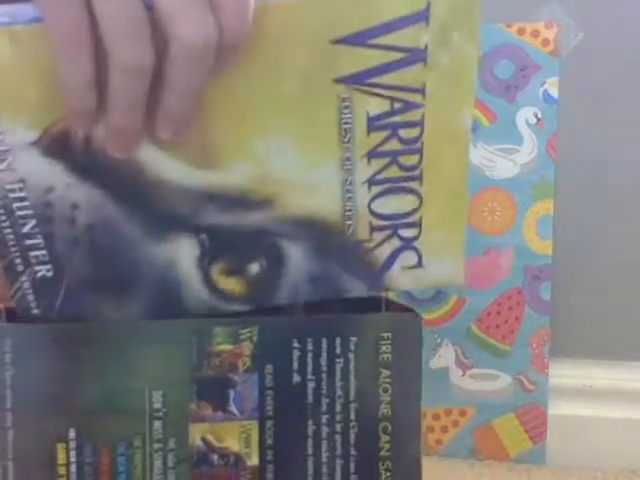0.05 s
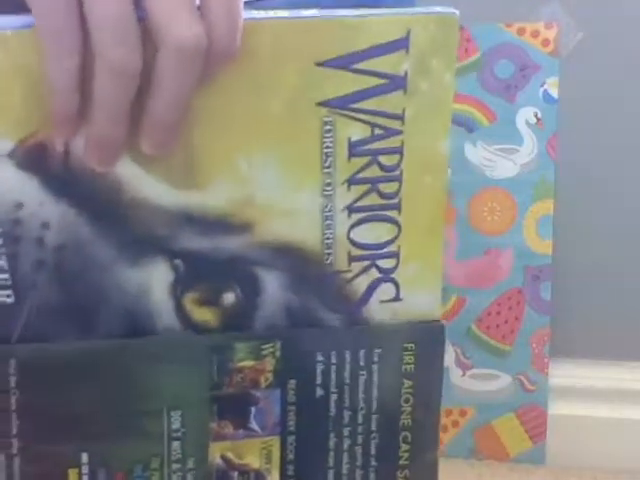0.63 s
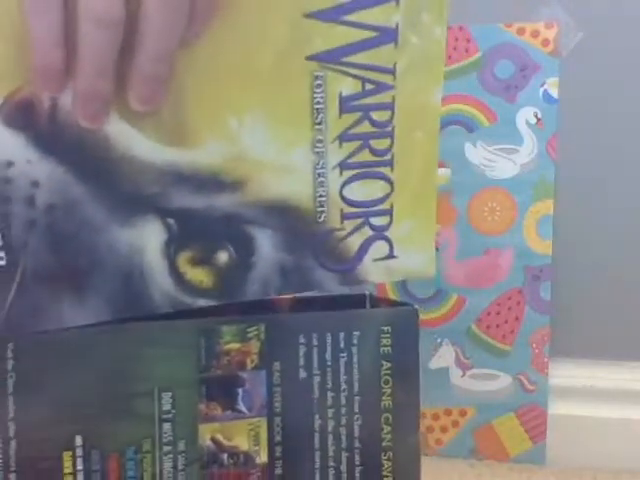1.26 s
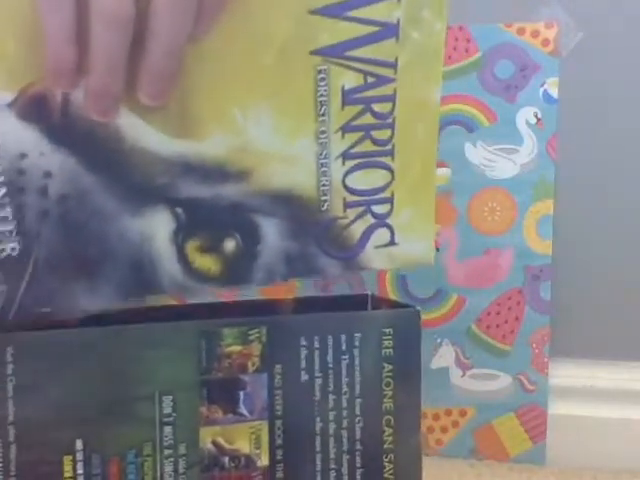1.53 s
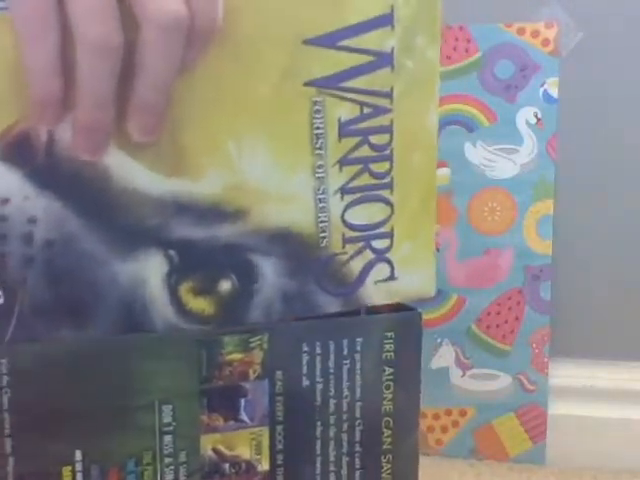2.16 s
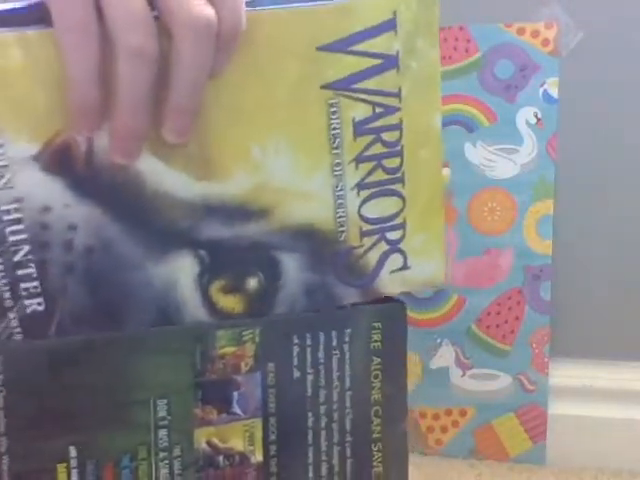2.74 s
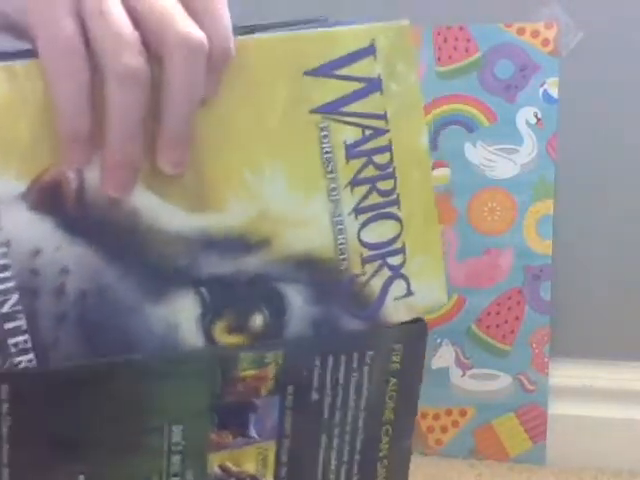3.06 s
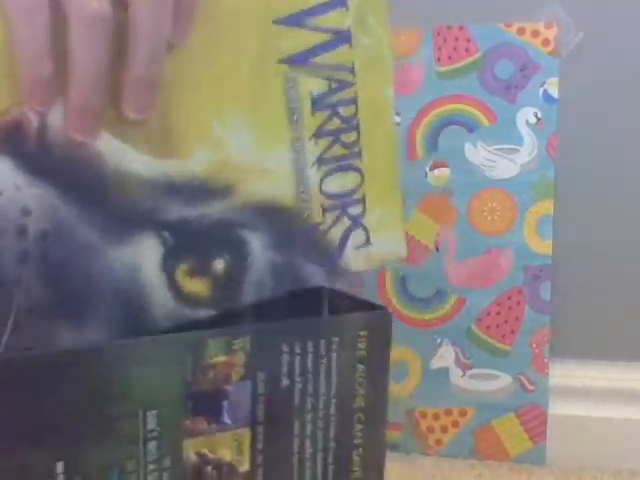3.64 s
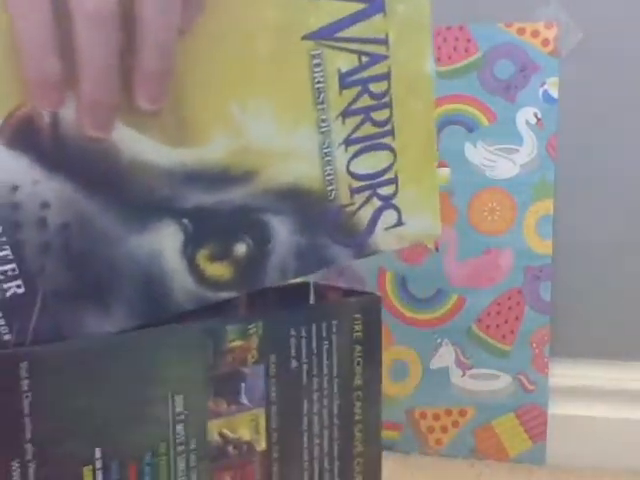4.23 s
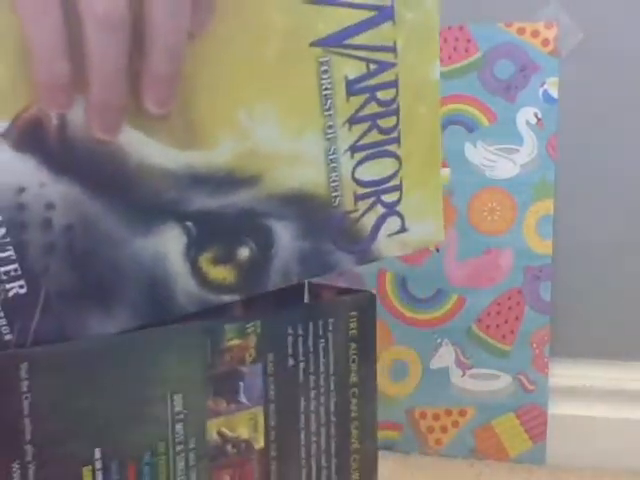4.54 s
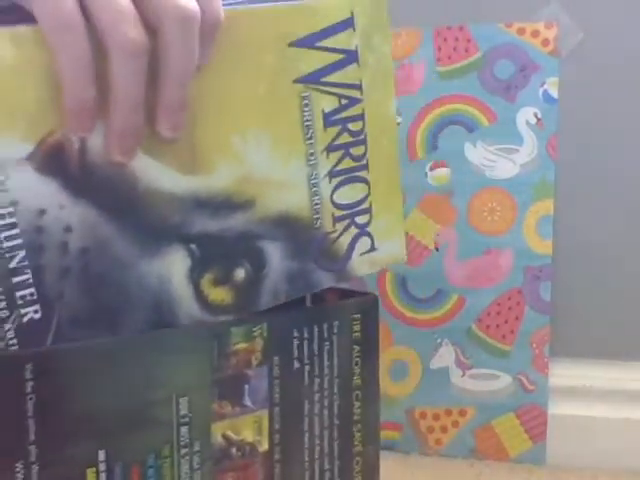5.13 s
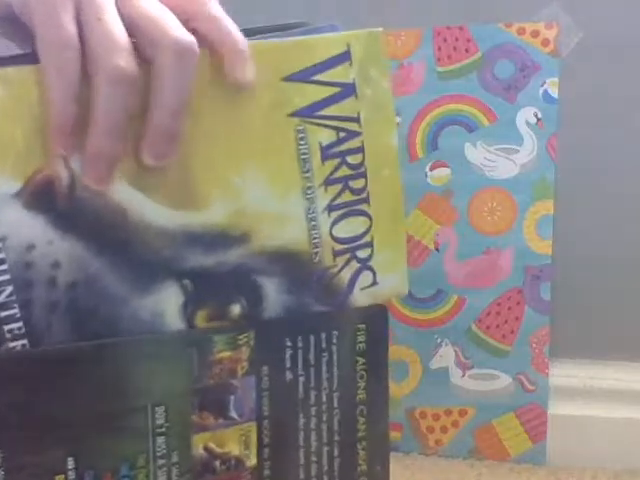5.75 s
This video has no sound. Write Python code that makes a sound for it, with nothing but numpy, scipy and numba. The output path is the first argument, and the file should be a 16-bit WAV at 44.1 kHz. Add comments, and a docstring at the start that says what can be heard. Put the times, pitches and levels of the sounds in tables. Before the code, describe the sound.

Paperback books are worked in and out of a cardboard case, heard close in a quiet room. Short, stuttering rubs of card with a papery hiss begin at once, and a hollow knock lands at about 0.4 seconds. Light sliding and small taps follow, with a crisp paper snap and a knock at 1.7 seconds. More short rubs and taps come between 2 and 2.6 seconds. Around 3 seconds a firmer scrape brings a quick cluster of knocks, snaps and low bumps. Softer sliding continues, with taps near 3.9 and 4.3 seconds. A rougher scrape swells at 5 seconds, then a sharp snap and knock hit at 5.5 seconds. Just before 6 seconds the books land with the loudest thump. A faint hiss and a thin, high electronic whine run underneath throughout.

```python
"""A soft, close rub of card over faint hiss and whine: paperbacks worked in and out of a slipcase.
The covers slide in short strokes; countless tiny slips ring the cardboard case and the cover,
and the page edges hiss. Paper snaps free, corners catch and knock, and the stack lands with a thump.
Lightly sliding edges sing with a rough tone. The room is quiet; the whine is the electronics."""
import sys
import numpy as np
from scipy import signal
from scipy.fft import rfft, irfft
from scipy.io import wavfile
from scipy.ndimage import uniform_filter1d
from numba import njit

SR = 44100
rng = np.random.default_rng(int(sys.argv[2]) if len(sys.argv) > 2 else 0)


def master(y):
    """Save y as 16-bit WAV."""
    cut = np.clip(np.atleast_2d(y).T, -1, 1)
    pcm = np.round(cut * 32767)  # scale
    wavfile.write(sys.argv[1], SR, pcm.astype(np.int16))


N = 264050
TIME = np.arange(N) / SR

# strokes of a cover along the case: peak_s, hold_s, attack_s, drone_db, cover_db, rasp_db, hiss_db
RUB_STROKES = [ (0.0, 0.025, .02, -56, -68.5, -70.5, -65), (0.239, 0.072, 0.0072, -46.5, -48, -51.5, -48.5),
               (0.325, 0.027, 0.022, -40, -51.5, -57, -55), (0.385, 0.012, 0.037, -52, -52.5, -62, -52),
               (0.426, 0.082, 0.013, -44, -60, -53.5, -49), (0.64, 0.054, 0.15, -51, -58, -70, -68),
               (0.715, 0.026, 0.083, -49.5, -51.5, -51.5, -48.5), (0.82, 0.068, 0.27, -61, -62, -69, -63),
               (1.087, .005, 0.17, -75, -76, -77, -53.5), (1.324, 0.079, 0.027, -62, -70.5, -90, -64.5),
               (1.649, 0.0024, 0.036, -67, -65, -56, -50), (2.055, 0.043, 0.014, -42, -43, -55, -54.5),
               (2.365, 0.019, 0.051, -45.5, -54, -56.5, -53),
               (2.466, 0.049, 0.075, -38.5, -44.5, -58, -57.5), (2.513, 0.01, 0.037, -47, -63, -55.5, -51),
               (2.626, 0.038, 0.13, -52, -59, -59, -48), (2.887, 0.069, 0.08, -45, -69, -57.5, -50),
               (2.992, 0.064, 0.011, -38, -42.5, -43, -38.5), (3.092, 0.019, 0.033, -45.5, -54, -50, -47.5),
               (3.215, 0.015, 0.075, -56.5, -64, -63.5, -61.5),
               (3.313, 0.033, 0.049, -64, -74, -66.5, -62.5), (3.502, 0.13, 0.11, -57, -63.5, -60.5, -56.5),
               (3.673, 0.28, 0.14, -61.5, -74, -67, -60.5), (3.89, .015, 0.076, -47.5, -58, -54.5, -46.5),
               (4.132, 0.028, 0.046, -74, -70, -65, -47.5), (4.21, 0.022, 0.28, -56, -61, -64, -57.5),
               (4.31, 0.022, 0.012, -46.5, -60.5, -64.5, -58),
               (4.436, 0.039, 0.023, -52.5, -66, -74.5, -64),
               (4.583, 0.0026, 0.038, -53.5, -82, -68, -49.5),
               (4.825, 0.17, 0.14, -53, -61.5, -70.5, -63.5), (4.988, 0.057, 0.087, -38, -42, -44.5, -42.5),
               (5.078, 0.0082, .03, -36, -39.5, -52.5, -48.5),
               (5.399, 0.045, 0.051, -42, -42.5, -46.5, -45), (5.503, 0.04, 0.09, -40.5, -44.5, -42, -40.5),
               (5.667, 0.0096, 0.048, -72, -72, -62, -54.5), (5.733, 0.028, 0.15, -55, -60.5, -66, -62),
               (5.821, 0.0094, .05, -73, -71, -58, -46.5), (5.847, 0.025, 0.026, -41, -44.5, -45, -45),
               (5.96, 0.013, 0.043, -40, -45.5, -44.5, -39.5)]
# resonances under rubbing (case drone, cover body, rasp on its face): pitch_hz, width_hz, gain_db
DRONE_RESONANCES = [(138.8, 54, -8), (225, 76, -11.5), (352, 69, 1.5), (499, 450, -13.5), (698, 50, -2.5),
                    (876, 43, 7.5), (1090, 120, -11)]
COVER_RESONANCES = [(1219, 304, 10.5), (1453, 218, -4), (1595, 140, 1), (2176, 235, -3)]
RASP_RESONANCES = [(2480, 99, -0.5), (3126, 310, 0), (3920, 600, -7), (4650, 520, -8), (5420, 610, -5.5),
                   (6300, 700, -6)]
# EQ curves of the page-edge hiss, the noise floor and a paper snap: frequency_hz, gain_db
PAGE_HISS_EQ = [(3000, -13), (7000, -17), (8500, -6), (10300, -0.5), (11500, -1), (13000, 1.5), (14500, 0),
                (16000, -14)]
FLOOR_EQ = [(25, -15), (62, -9), (120, 5), (165, -7), (250, -12), (450, -22.5), (750, -24.5), (1600, -26.5),
            (4000, -33), (7000, -39.5), (8500, -29.5), (10000, -24.5), (13000, -18.5), (16000, -17)]
SNAP_EQ = [(600, -3), (2000, -37.5), (4000, -3), (8000, -3), (10300, 6), (13000, 8.5), (16000, -0.5)]
# steady whine of the electronics: pitch_hz, rms_db
WHINE_TONES = [(8000, -72), (12672, -82), (12705, -79), (12947, -83), (13803, -85)]
# edges snapping free, stiff card darker than a leaf: time_s, level_db, flutter_db, tilt_db_per_octave
PAPER_SNAPS = [(0.236, -34.5, -8, -0.5), (1.097, -38.5, -25, .5), (1.377, -43, -23, 3),
               (1.666, -24.5, -29, 0), (2.986, -28.5, -2, 2), (3.006, -34.5, 3, 0), (3.902, -45.5, 1, -3),
               (4.594, -41.5, -4, -1), (5.302, -47.5, -5, -6.5), (5.52, -22.5, 1.5, -4.5),
               (5.963, -29.5, -19, -7)]
# books hitting the case: time_s, knock_db, favoured_pitch_hz, boom_db, softness (.5 corner, 1.5 flat side)
BOOK_KNOCKS = [ (.3145, -32, 780, -49, 0.56), (0.336, -46, 740, -32, 0.29), (.426, -14, 610, -44, 1.27),
               (.435, -24.5, 700, -26, 0.52), (0.489, -26.5, 1040, -61, 0.98),
               (0.7651, -31, 1000, -42, 0.68), (1.095, -32, 790, -48, 0.89), (1.238, -47.5, 760, -43, 2.6),
               (1.385, -44, 755, -62.5, 1.26), (1.667, -25.5, 757, -37.5, 0.56),
               (2.072, -28.5, 1170, -63, 0.72), (2.446, -27.5, 710, -70, 1.08), (2.815, -42, 640, -54, 2.6),
               (2.945, -30, 650, -39.5, 0.54), (2.983, -19.5, 626, -33, 1.14), (3.006, -27, 590, -29, 0.62),
               (3.051, -21.5, 543, -25.5, 0.88), (3.083, -24.5, 630, -32, .5),
               (3.209, -44, 577, -54.5, 0.53), (3.395, -39, 470, -64, 0.74),
               (3.902, -25.5, 820, -34.5, 0.51), (4.309, -31.5, 730, -36.5, 0.8),
               (4.548, -45.5, 630, -49, 0.46), (4.694, -44.5, 556, -58, 1.37),
               (4.895, -48, 620, -40.5, 1.6), (5.255, -52.5, 670, -38.5, 2.6),
               (5.298, -45.5, 734, -32.5, 1.25), (5.348, -54, 725, -36, 0.9), (5.521, -15, 637, -22, 0.59),
               (5.544, -28.5, 686, -29, 0.55), (5.626, -49.5, 645, -40.5, 2.3),
               (5.732, -53, 455, -40.5, 0.98), (5.85, -28, 920, -37, 0.61), (5.962, -12, 633, -12, 1.44),
               (5.972, -22, 680, -13.5, 1.42), (5.981, -18.5, 750, -31, 0.5)]
# modes of the filled case, its flexing walls and the stack on its support: pitch_hz, gain_db, t60_s
CASE_RING_MODES = [(486.4, -1.5, 0.068), (535.3, -4.5, 0.1), (631, 4, 0.036), (704, 9, 0.026),
                   (757, 3, 0.057), (863, -14, 0.075), (1036, -1, 0.031), (1295, -16, 0.036),
                   (1537, -43, 0.017), (1710, -6.5, 0.066), (1793, -16, 0.034)]
WALL_BOOM_MODES = [(162.7, -1.5, 0.061), (203, 3, 0.027), (232, -4, 0.059), (252.2, -0.5, 0.1),
                   (358.6, 2.5, 0.042), (445.3, -4.5, 0.044)]
STACK_THUMP_MODES = [(65.5, 2, 0.05), (80.6, -0.5, 0.047), (121.2, -2, 0.17), (153.7, -25.5, 0.28)]
# the stack dropping onto its support: start_s, level_db
STACK_LANDINGS = [(0.425, -30), (1.234, -39.5), (1.669, -37), (2.946, -28), (2.9822, -22), (3.005, -22),
                  (3.047, -35), (4.874, -42.5), (5.9592, -17.5)]
# lightly sliding edges, each stirring one rough resonance, plus a short crumple of card near 3.05 s as the
# stack judders: start_s, end_s, pitch_hz, level_db
EDGE_TONES = [(0.481, 0.501, 1730, -43), (0.564, .72, 815, -48), (.613, 0.785, 1730, -51),
              (.616, .935, 3160, -70), (0.856, 0.946, 626, -58), (0.982, 1.122, 790, -57),
              (1.063, 1.115, 1830, -59), (1.242, 1.46, 730, -65.5), (2.142, 2.88, 784, -62),
              (2.427, 2.544, 1270, -49), (2.801, 2.986, 1310, -53.5), (2.835, 2.975, 1990, -52.5),
              (2.869, 2.97, 3260, -53.5), (3.013, 3.126, 1135, -49.5), (3.1, 3.406, 545, -63.5),
              (3.14, 3.402, 1464, -66), (3.411, 3.936, 5140, -66), (3.44, 3.88, 3230, -70.5),
              (0.77, 0.917, 4750, -71.5), (2.33, 2.42, 5500, -67), (4.65, 4.904, 670, -61),
              (4.934, 5.127, 1440, -41.5), (4.92, 5.11, 2126, -44), (4.954, 5.117, 833, -43.5),
              (4.968, 5.105, 3250, -42)]

STROKE_FADE_DB, STROKE_RELEASE_S = 20, 0.053  # attack and release each span STROKE_FADE_DB
LIGHT_TOUCH_DB, FIRM_TOUCH_DB = -88.5, -44.5  # drone levels over which the whole case joins in
MIDDLE_SPOT_HZ, WALL_STIFFENING = 702, 0.16  # a higher-pitched spot also lifts the wall modes


def undb(db):
    """Decibels to gain."""
    return 10 ** (np.asarray(db) / 20)


def unit(x):
    """Scale to rms 1."""
    return x / np.sqrt(np.mean(x ** 2))


def add(track, start_s, sound):
    """Mix a sound into the track."""
    i = int(start_s * SR)
    track[i:i + len(sound)] += sound[:max(N - i, 0)]


def drift(rate_hz):
    """Smooth random modulation, rms 1."""
    span = max(int(SR / rate_hz), 1)
    return unit(uniform_filter1d(uniform_filter1d(rng.standard_normal(N), span), span))


def equalise(x, curve):
    """Shape a sound with an EQ curve."""
    hz, db = np.transpose(curve)
    bins_hz = np.maximum(np.fft.rfftfreq(len(x), 1 / SR), 1)
    return irfft(rfft(x) * undb(np.interp(np.log(bins_hz), np.log(hz), db)), len(x))


def band(x, low_hz, high_hz, order=3):
    """Keep one band."""
    return signal.sosfilt(signal.butter(order, [low_hz, high_hz], "band", fs=SR, output="sos"), x)


@njit
def resonate(x, hz, width_hz):
    """Sweepable state-variable band-pass."""
    y, band_state, low_state = np.empty(len(x)), 0., 0.
    for i in range(len(x)):
        g, damping = np.tan(np.pi * hz[i] / SR), width_hz / hz[i]
        passed = (band_state + g * (x[i] - low_state)) / (1 + g * (g + damping))
        band_state = 2 * passed - band_state
        low_state += 2 * g * passed
        y[i] = damping * passed
    return y


def stroke_levels():
    """Each stroke speeds up, holds and dies away: dB envelopes for drone, cover, rasp and hiss."""
    power = np.full((4, N), 1e-14)
    for peak_s, hold_s, attack_s, *db in RUB_STROKES:
        fade = np.maximum(peak_s - TIME, 0) / attack_s
        fade += np.maximum(TIME - peak_s - hold_s, 0) / STROKE_RELEASE_S
        live = fade < 4
        power[:, live] += undb(np.array(db)[:, None] - STROKE_FADE_DB * fade[live]) ** 2
    return 10 * np.log10(power)


def slips(per_s, spread_db):
    """Fibres catch and let go: random clicks of uneven size."""
    hit = rng.random(N) < per_s / SR
    size = undb(spread_db * np.clip(rng.standard_normal(N), -2, 2))
    return unit(hit * size * np.sign(rng.standard_normal(N))) + 1e-18


def hollow(x, round_trip_s=0.001454, echo_gain=.38):
    """Echoes inside the case lift multiples of about 700 Hz; the gap shifts as the books move."""
    lag = round_trip_s * SR * (1 + 0.087 * drift(rate_hz=2.73))
    i = np.arange(N)
    return sum(echo_gain ** k * np.interp(i - k * lag, i, x) for k in range(4))


def sheet(x, resonances, bend):
    """A sheet's resonances shift together as it bends; neighbours swing in opposite phase."""
    return sum((-1) ** k * undb(db) * resonate(x, hz * bend, float(width_hz))
               for k, (hz, width_hz, db) in enumerate(resonances))


def rubbing():
    """Slips drive the case and the cover; uneven hand pressure makes every stroke stutter."""
    drone_db, cover_db, rasp_db, hiss_db = stroke_levels()
    grip_db = 3 * drift(rate_hz=39)
    friction = hollow(slips(per_s=4200, spread_db=2.0) * undb(grip_db))
    # a light touch stirs mostly the main resonance of the case; pressing brings in the others
    case_bend = 1 + 0.082 * drift(rate_hz=3.15)
    main_hz, width_hz = 715 * case_bend, 210.0
    main = unit(resonate(resonate(friction, main_hz, width_hz), main_hz, width_hz))
    others = unit(band(sheet(friction, DRONE_RESONANCES, case_bend), 54, 935))
    pressure = np.clip((drone_db - LIGHT_TOUCH_DB) / (FIRM_TOUCH_DB - LIGHT_TOUCH_DB), .2, 1)
    drone = undb(-1.0) * main + undb(0.5) * pressure * others
    cover_bend = 1 + 0.056 * drift(rate_hz=12.8)
    cover = unit(band(sheet(friction, COVER_RESONANCES, cover_bend), 1050, 2500))
    rasp_bend = 1 + np.clip(0.065 * drift(rate_hz=4), -.25, .25)
    rasp = unit(band(sheet(friction, RASP_RESONANCES, rasp_bend), 2290, 7100))
    page_friction = hollow(slips(per_s=11000, spread_db=4.5))
    hiss = unit(equalise(page_friction, PAGE_HISS_EQ) * undb(0.72 * grip_db))
    return drone * undb(drone_db) + cover * undb(cover_db) + rasp * undb(rasp_db) + hiss * undb(hiss_db)


def noise_floor(noise_db=-61.5):
    """A bed of low room rumble, microphone hiss and thin electronic whine."""
    noise = unit(equalise(rng.standard_normal(N), FLOOR_EQ)) * undb(noise_db)
    whine = sum(np.sqrt(2) * undb(db) * np.sin(2 * np.pi * hz * TIME) for hz, db in WHINE_TONES)
    return noise + whine


def paper_snaps(lead_s=.01):
    """A paper edge snaps with a sharp, crisp crack and flutters briefly."""
    out = np.zeros(N)
    t = np.arange(SR // 10) / SR - lead_s
    for time_s, db, flutter_db, tilt in PAPER_SNAPS:
        curve = [(hz, gain + tilt * np.log2(hz)) for hz, gain in SNAP_EQ]
        burst = unit(equalise(rng.standard_normal(len(t)), curve))
        release = np.exp(-np.abs(t) / 0.0012) + undb(flutter_db) * np.exp(-np.abs(t) / 0.004)
        envelope = np.where(t < 0, np.exp(-np.abs(t) / 0.00053), release)
        add(out, time_s - lead_s, undb(db) * envelope * burst)
    return out


def ring(modes, t, rise_s):
    """Decaying modes after a soft blow, peak 1; opposite phases let the ring build over a few cycles."""
    x = sum((-1) ** k * undb(db - 60 * t / t60) * np.sin(2 * np.pi * hz * t)
            for k, (hz, db, t60) in enumerate(modes))
    x *= 1 - np.exp(-(t / rise_s) ** 2)
    return x / np.abs(x).max()


def knocks_and_landings(rock_db=-8):
    """Each blow rings the case near its pitch, flexes the walls and rocks the stack; landings thump."""
    out, t = np.zeros(N), np.arange(SR // 4) / SR
    thump = ring(STACK_THUMP_MODES, t, rise_s=0.0051)
    for time_s, knock_db, pitch_hz, boom_db, softness in BOOK_KNOCKS:
        # a softer contact pushes longer and favours the lowest wall modes
        softness = np.clip(softness, .3, 2)
        case = [(hz, db - 14 * abs(np.log2(hz / pitch_hz)), t60 * softness ** 0.86)
                for hz, db, t60 in CASE_RING_MODES]
        pitch_ratio = (pitch_hz / MIDDLE_SPOT_HZ) ** WALL_STIFFENING
        walls = [(hz * pitch_ratio, db - 13 * np.log2(softness) * np.log(hz / 280), t60)
                 for hz, db, t60 in WALL_BOOM_MODES]
        # a hard corner also crunches the card for a few milliseconds
        crunch = unit(band(rng.standard_normal(len(t)), 490, 2210, order=2))
        crunch *= np.exp(-t / 0.0069) * undb(-30.5) / softness ** 3
        knock = undb(knock_db) * (ring(case, t, rise_s=0.0026 * softness ** 2) + crunch)
        boom = undb(boom_db) * (ring(walls, t, rise_s=0.01 * softness) + undb(rock_db) * thump)
        add(out, time_s - 0.00189 * softness, knock + boom)
    for start_s, db in STACK_LANDINGS:
        add(out, start_s, undb(db) * thump)
    return out


def swell(n, rise_share, fall_share):
    """Smooth fade in, hold and fade out over n samples."""
    along = np.linspace(0, 1, n)
    ramp = np.minimum(along / rise_share, (1 - along) / fall_share)
    return np.sin(np.pi / 2 * np.clip(ramp, 0, 1)) ** 2


def singing_edges(sag_share=0.017):
    """Slips feed one resonance, which sinks and wobbles as the free length of the edge changes."""
    out, friction = np.zeros(N), slips(per_s=3600, spread_db=7.5)
    wobble = 1 + 0.036 * drift(rate_hz=31)
    for start_s, end_s, pitch_hz, db in EDGE_TONES:
        i, n = int(start_s * SR), max(int((end_s - start_s) * SR), SR // 50)
        hz = pitch_hz * (1 - sag_share * np.linspace(-.5, .5, n)) * wobble[i:i + n]
        width_hz = 71 + 0.079 * pitch_hz
        tone = resonate(resonate(friction[i:i + n], hz, width_hz), hz, width_hz)
        add(out, start_s, undb(db) * unit(tone) * swell(n, rise_share=0.35, fall_share=0.23))
    return out


def room(x, t60_s=0.051, wet_db=-16, dull_hz=4500):
    """Short, dull reflections from the nearby wall and floor."""
    t = np.arange(SR // 2) / SR
    tail = band(rng.standard_normal(len(t)), 130, dull_hz, order=1) * undb(-60 * t / t60_s) * (t > .005)
    return x + undb(wet_db) * signal.fftconvolve(x, tail / np.linalg.norm(tail))[:N]


def scene():
    """Books and case in the room, over the noise floor, in mono."""
    books = rubbing() + singing_edges() + knocks_and_landings() + paper_snaps()
    return (room(books) + noise_floor())[None]


def record(dry):
    """A steep low-pass takes off the very top."""
    return signal.sosfilt(signal.ellip(10, .2, 70, 16050, fs=SR, output="sos"), dry)


dry = scene()
out = record(dry)
master(out)
```